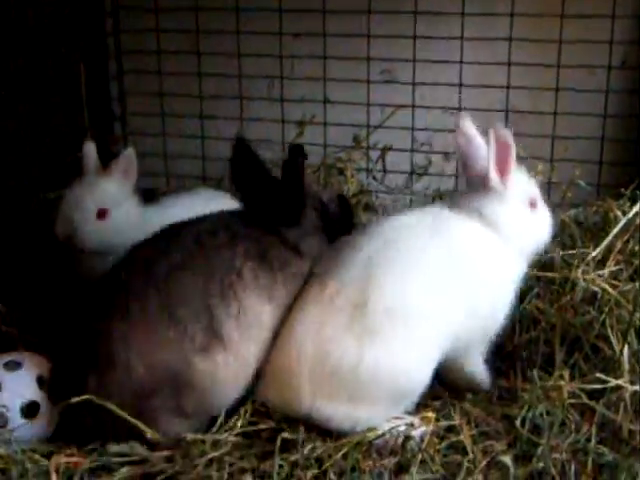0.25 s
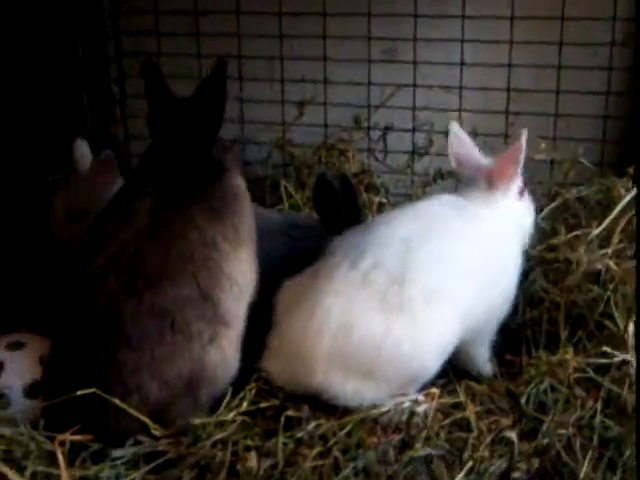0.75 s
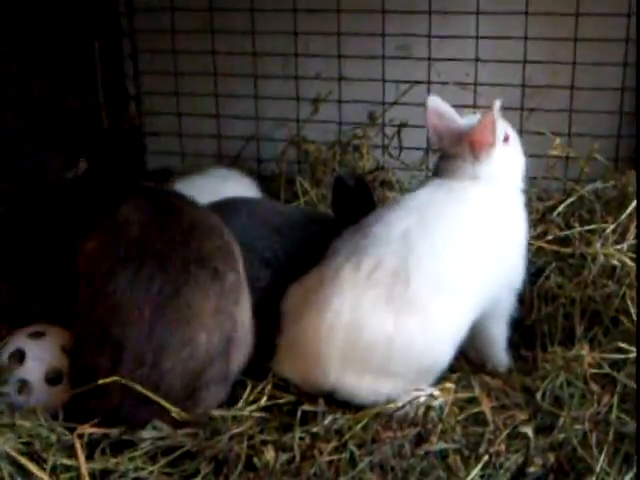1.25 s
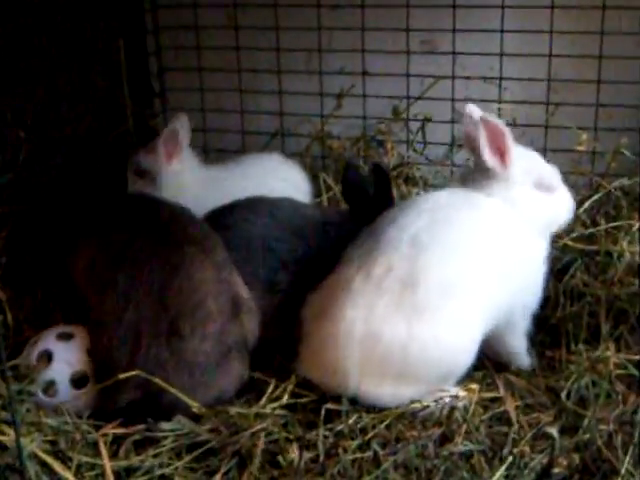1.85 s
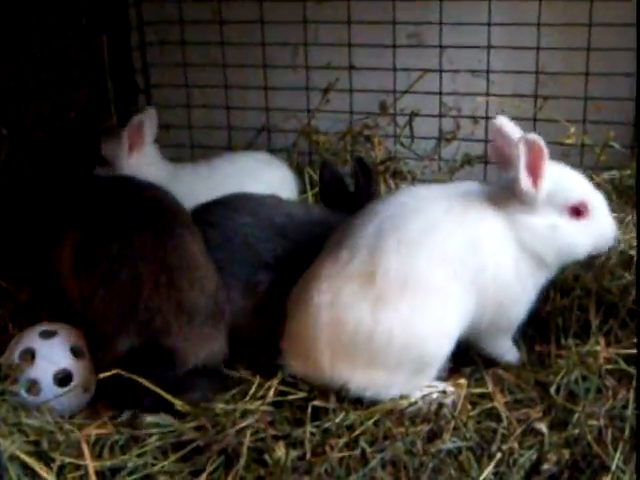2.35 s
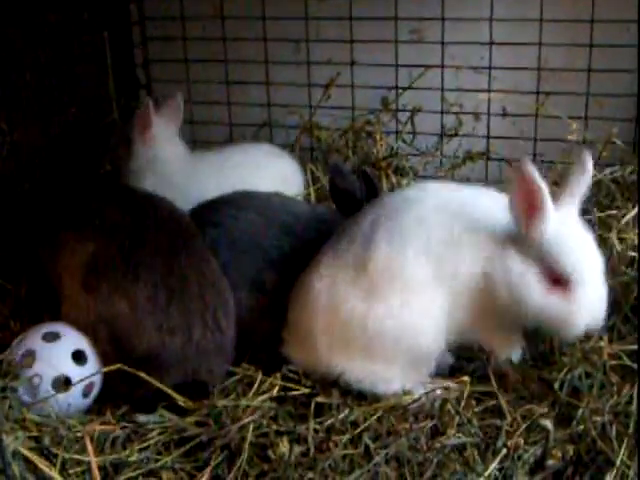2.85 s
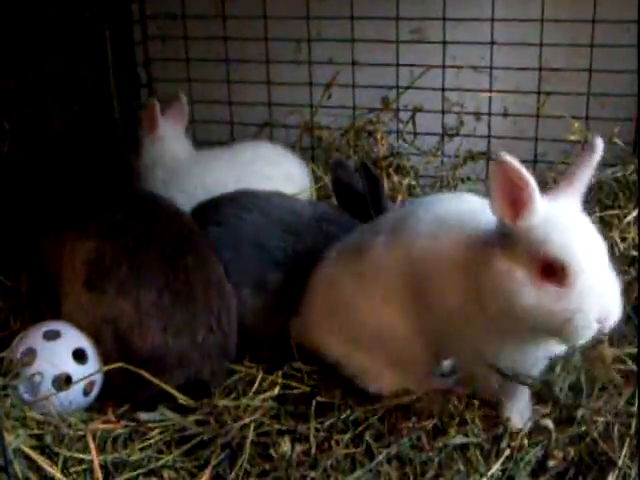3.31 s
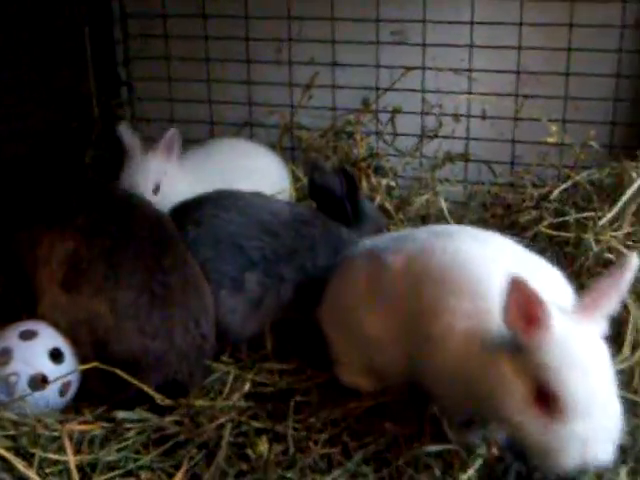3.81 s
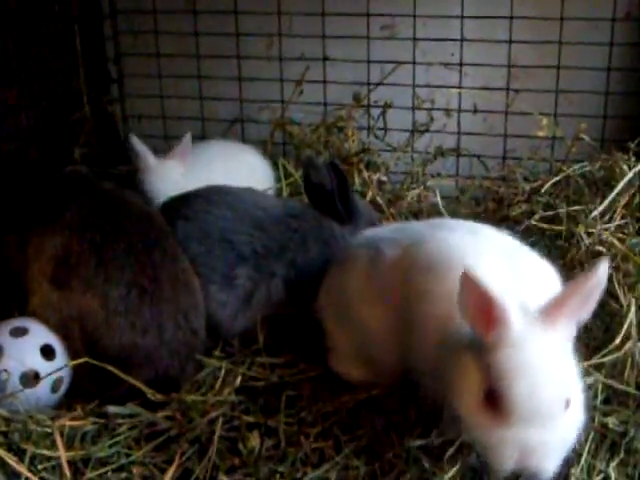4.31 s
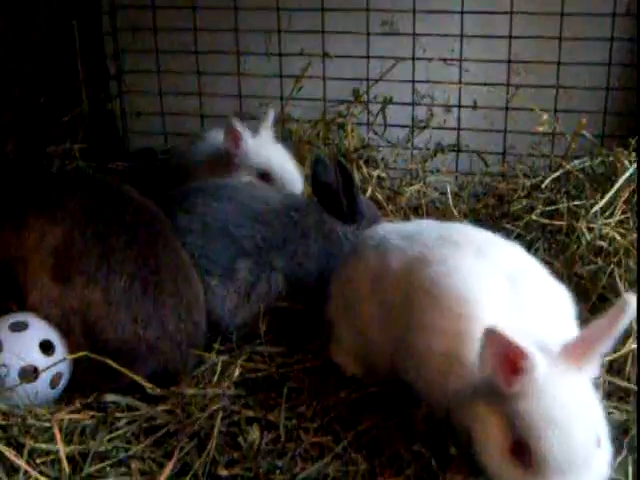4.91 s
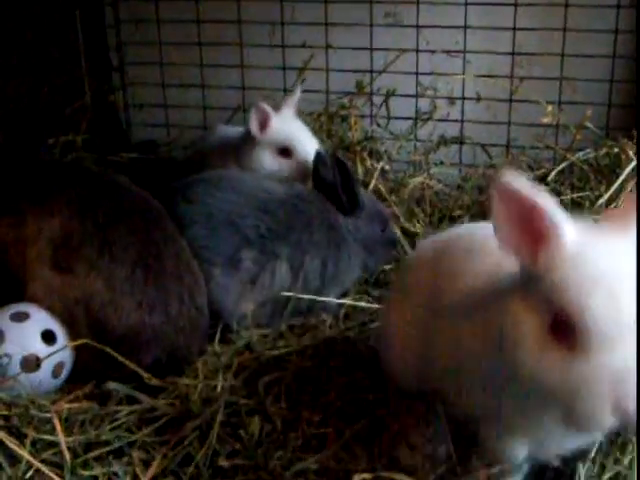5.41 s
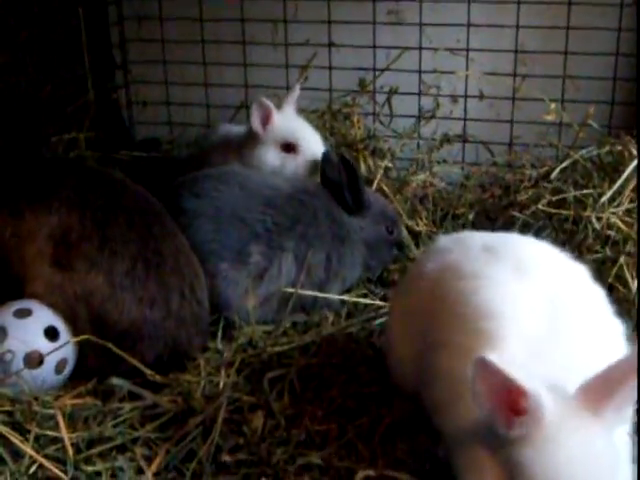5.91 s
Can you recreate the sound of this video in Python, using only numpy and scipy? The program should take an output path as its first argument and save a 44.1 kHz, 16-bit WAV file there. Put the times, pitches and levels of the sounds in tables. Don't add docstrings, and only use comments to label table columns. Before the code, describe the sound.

Rabbits nibble and shift in a hay-lined pen, very quietly. Steady hiss from a small camera nearly covers them. Its lens motor clicks in tiny four-step bursts several times a second, and low dull thuds pulse irregularly beneath. Crisp hay snaps and soft paw bumps cluster at the start, around the middle and before the five-second mark. The microphone is close and cheap, the sound dry, with no echo.

```python
import sys
import numpy as np
from scipy import signal
from scipy.fft import rfft, irfft
from scipy.io import wavfile
from scipy.ndimage import uniform_filter1d

SR = 44100
rng = np.random.default_rng(int(sys.argv[2]) if len(sys.argv) > 2 else 0)


def voltage_ratio(decibels):
    exponent = np.asarray(decibels, float) / 20
    return 10 ** exponent


def to_wav(sig):
    pcm = np.clip(np.atleast_2d(sig), -1, 1) * 32767
    pcm = np.round(pcm).astype(np.int16)
    wavfile.write(sys.argv[1], SR, pcm.T)


N = 271636


def evened(x):
    return x / np.sqrt(np.mean(x ** 2) + 1e-20)


def body_ring(resonances):
    t = np.arange(900) / SR
    answer = np.zeros(900)
    for k, (hz, width_hz, db) in enumerate(resonances):
        fade = np.exp(-np.pi * width_hz * t)
        answer += (-1) ** k * voltage_ratio(db) * fade * np.sin(2 * np.pi * hz * t)
    return answer / np.linalg.norm(answer)


def add(mix, start_s, sound):
    part = mix[round(start_s * SR):][:len(sound)]
    part += sound[:len(part)]


# frequency in Hz, level in dB per Hz.
HISS_COLOUR = [(12, -28.5), (20, 4), (49, -5.5), (395, -15.5), (473, -18.5), (626, -18), (808, -21),
               (2300, -27), (4200, -29.5), (4690, -31.5), (5470, -30.5), (7060, -29), (7700, -29.5),
               (8000, -32.5)]
HISS_DB = -52


def hiss():
    frames, hz = N // 256 + 5, np.fft.rfftfreq(1024, 1 / SR)
    real, imaginary, patches = rng.standard_normal((frames, 513, 3)).T
    patches = uniform_filter1d(patches, size=12, axis=0)
    patches = evened(uniform_filter1d(patches, size=8, axis=1))
    colour_hz, colour_db = np.transpose(HISS_COLOUR)
    level_db = np.interp(np.log(hz + 1), np.log(colour_hz + 1), colour_db)
    spectrum = (real + 1j * imaginary) * voltage_ratio(level_db[:, None] + 1.02 * patches)
    noise = signal.istft(spectrum, nperseg=1024, noverlap=768)[1][:N]
    return voltage_ratio(HISS_DB) * evened(noise)


# frequency in Hz, level in dB.
WHINE_TONES = [(4290, -75.5)]


def whine():
    t = np.arange(N) / SR
    return sum(np.sqrt(2) * voltage_ratio(db) * np.sin(2 * np.pi * hz * t) for hz, db in WHINE_TONES)


# start in seconds, depth of the sag in dB, length in ms.
PLAIN_WRITES = [(0.28, -35.6, 8.6), (0.7194, -36.6, 11.0), (0.8724, -35.4, 9.3), (1.0066, -35.0, 9.0),
                (1.112, -36.6, 13.6), (1.3026, -38.5, 9.4), (1.4033, -36.8, 11.9), (1.6739, -36.2, 10.8),
                (1.775, -34.5, 9.8), (2.0816, -35.2, 11.5), (2.2818, -35.9, 9.2), (2.4179, -37.1, 10.2),
                (2.6667, -35.1, 9.4), (2.7713, -37.2, 11.1), (2.9428, -35.6, 10.6), (3.0869, -37.4, 13.2),
                (3.239, -36.2, 9.4), (3.4155, -36.7, 11.6), (3.6731, -34.6, 8.3), (3.8301, -36.2, 8.9),
                (4.0788, -34.3, 9.0), (4.3345, -36.2, 8.5), (4.4664, -36.7, 12.3), (4.6183, -34.0, 8.6),
                (4.7491, -35.1, 12.9), (4.918, -34.7, 8.5), (5.537, -35.4, 9.2), (5.7054, -35.2, 11.5),
                (5.9801, -35.1, 12.1), (6.0822, -34.6, 9.1)]
EASE_AT_MS, EASE_SHARE = 4.8, .2
# start in seconds, depth of the sag in dB, length in ms,
# time of the pause in ms, share of the sag recovered in the pause.
BROKEN_WRITES = [
    (0.0945, -29.3, 20.0, 5.1, 0.06),
    (0.4179, -35.4, 12.3, 11.6, 0.67),
    (0.5865, -36.1, 15.3, 6.3, 1.06),
    (1.5475, -35.4, 11.2, 3.0, 0.9),
    (1.9456, -35.0, 13.2, 10.1, 1.12),
    (2.5347, -35.5, 11.0, 5.6, 0.85),
    (5.0673, -36.4, 13.8, 16.0, 0.0),
    (5.245, -38.5, 10.7, 12.1, 1.2),
    (5.4129, -37.3, 18.2, 3.6, 0.89),
    (5.8169, -35.3, 13.2, 5.0, 0.88),
]
# multiple of the page rate, level in dB against the sag.
PAGE_RIPPLE = [(1, -16.5), (1.5, -26.5), (2, -20.5), (3, -21.5), (6, -27.5)]
PAGE_HZ = 206.1
SAG_TRIM_DB, COUPLING_HZ = 0.3, 7.0


def sags():
    out = np.zeros(N)
    multiple, ripple_db = np.transpose(PAGE_RIPPLE)[:, :, None]
    plain = [(*row, EASE_AT_MS, EASE_SHARE) for row in PLAIN_WRITES]
    writes = sorted(plain + BROKEN_WRITES)
    chances = rng.random((len(writes), 3, len(PAGE_RIPPLE), 1))
    ms = np.arange(1600) / SR * 1000 - 4
    for (s, db, length, pause, share), (phase, detune, size) in zip(writes, chances):
        onset = .5 + .5 * np.tanh(ms / 0.9)
        release = .5 + .5 * np.tanh((length - ms) / 0.92)
        load = onset * release * (1 - share * np.exp(-((ms - pause) / 1.21) ** 2))
        turns = multiple * PAGE_HZ * (1 + 0.067 * (detune - .5)) * ms / 1000 + phase
        ripple = voltage_ratio(ripple_db + 6.0 * (size - .5)) * np.cos(2 * np.pi * turns)
        load = load * (1 + np.sum(ripple, axis=0))
        add(out, s - .004, -voltage_ratio(db + SAG_TRIM_DB) * load)
    return signal.lfilter(*signal.butter(1, COUPLING_HZ, "high", fs=SR), out)


def rattles(resonances, fade_s, swell=0):
    t = np.arange(600) / SR
    blows = rng.standard_normal((len(TICKS), 4, 600)) * t ** swell * np.exp(-t / fade_s)
    rung = signal.fftconvolve(blows, body_ring(resonances)[None, None], axes=-1)
    return rung / abs(rung).max(-1, keepdims=True)


# start in seconds, peak in dB, step (0-3) at which the push peaks.
TICKS = [(0.1239, -34, 1.4), (0.2569, -44, .9), (0.364, -38, 1.8), (0.5581, -42.5, 1.7), (0.7897, -37, .6),
         (0.9279, -43.5, 1.2), (1.1249, -40.5, 1.4), (1.2941, -45.5, 1.9), (1.4957, -40, 1.6),
         (1.6947, -46.5, 1.8), (1.823, -41.5, 1.7), (2.0286, -47.5, 1.9), (2.1937, -43, 0.98),
         (2.3884, -46, 3.3), (2.5896, -42.5, 1.5), (2.6911, -46.5, 2.3), (2.8948, -43, 1.7),
         (3.031, -46, 1.1), (3.2309, -39.5, 1.5), (3.3686, -46.5, 1.3), (3.556, -40.5, 1.7),
         (3.6922, -44, 1.3), (3.8942, -39.5, 0.69), (4.0922, -42.5, 1.3), (4.2234, -38.5, 2),
         (4.4569, -43.5, 0.87), (4.6967, -38, 2.1), (4.827, -43, 1.8), (4.9684, -52, .6)]
# frequency in Hz, width in Hz, level in dB.
SHELL = [(3115, 214, -12.5), (4170, 720, -8.5), (5586, 540, -0.5), (6414, 330, -2.5), (6590, 420, -4.5),
         (7660, 780, -1.5)]
# frequency in Hz, width in Hz, level in dB.
KNOCK = [(645, 186, 0), (986, 275, -4), (1355, 220, -5.5), (1950, 420, -3.5)]
# frequency in Hz, width in Hz, level in dB.
BARREL = [(2430, 1000, 0.5), (3120, 480, 3.5), (3820, 660, -1.5)]
STEP_S = .002
DROOP_DB = 1.5
KNOCK_DB, KNOCK_GROWTH, USUAL_PEAK_DB = -48, 0.3, -42.5


def motor():
    out = np.zeros(N)
    rings, knocks = rattles(SHELL, 0.00014), rattles(KNOCK, 0.0019)
    barrels, whirrs = rattles(BARREL, 0.0024), rattles(SHELL, .002, swell=0.72)
    bursts = zip(TICKS, rings, knocks, barrels, whirrs)
    for (s, peak_db, peak_step), ring, knock, barrel, whirr in bursts:
        steps_db = peak_db - DROOP_DB * (np.arange(4) - peak_step) ** 2
        knock_db = KNOCK_DB + KNOCK_GROWTH * (peak_db - USUAL_PEAK_DB)
        barrel_db = np.mean(steps_db) - 12.5
        for k, db in enumerate(steps_db):
            step_s = s + k * STEP_S
            body = voltage_ratio(knock_db) * knock[k] + voltage_ratio(barrel_db) * barrel[k]
            add(out, step_s, voltage_ratio(db + 2.0) * ring[k] + body)
            add(out, step_s - .0025, voltage_ratio(db - 12.5) * whirr[k])
    return out


# start in seconds, peak in dB, pitch in Hz,
# time to fade by 60 dB in seconds.
BUMPS = [
    (.515, -41, 930, 0.046),
    (2.19, -42, 294, 0.1),
    (3.078, -42.5, 231, 0.064),
    (4.795, -54, 404, 0.024),
    (4.952, -49, 380, 0.045),
    (5.409, -49, 414, 0.076),
    (0.1, -49, 277, .06),
    (.125, -38.5, 1017, 0.033),
    (4.086, -44, 1030, 0.041),
    (4.698, -33.5, 1470, 0.022),
]


def paws():
    out, t = np.zeros(N), np.arange(4000) / SR
    for s, db, hz, t60 in BUMPS:
        push = 1 - np.exp(-t / 0.0041)
        add(out, s, voltage_ratio(db - 60 * t / t60) * push * np.sin(2 * np.pi * hz * t))
    return out


# time of the climax in seconds, level in dB, spread in seconds.
STIRS = [(0, -57.5, 0.11), (.16, -56.5, 0.081), (.29, -55.5, 0.028), (.45, -61.5, .15),
         (1.68, -56.5, 0.046), (1.83, -61, .03), (2.609, -50, .02), (3.25, -67, 0.057), (3.66, -55, 0.087),
         (4.69, -53.5, 0.017), (4.8, -54.5, 0.035), (4.96, -59, .08), (5.3, -62, 0.092), (5.42, -52.5, 0.1),
         (5.53, -60, 0.074), (5.69, -58, 0.037), (5.821, -53, .04), (6.16, -59, 0.22)]
CHEWING_DB = -66.5


def stirring():
    t = np.arange(N) / SR
    return voltage_ratio(CHEWING_DB) + sum(voltage_ratio(db) * np.exp(-abs(t - s) / spread) for s, db, spread in STIRS)


# start in seconds, peak in dB, low knock in dB against the snap,
# time to fade by 60 dB in seconds.
SNAPS = [(0.115, -32.5, -14.5, 0.017), (0.1804, -56, -10, 0.025), (0.282, -44, -9, 0.032),
         (0.4997, -44.5, -1, 0.033), (0.5381, -39, -2, 0.025), (0.7991, -42, -3, 0.015),
         (1.66, -45, 3, 0.025), (2.6844, -36.5, -18, 0.011), (3.252, -61, -6, 0.022),
         (3.884, -44.5, -13, 0.035), (3.9408, -49, -14, 0.017), (4.2128, -40, -14, 0.044),
         (4.6707, -35, -28, 0.036), (4.6846, -37.5, -10, 0.045), (4.7945, -45.5, -9, 0.031),
         (5.7946, -53, -9, 0.014), (5.8206, -40, -16, 0.028), (5.9388, -45.5, 3, 0.031)]
# frequency in Hz, width in Hz, level in dB.
STALKS = [(1130, 690, -2), (3100, 940, -1), (4020, 870, -1.5), (5560, 960, -3.5), (7270, 1100, -1)]
GRAINS_PER_S = 5400


def hay():
    snaps, knocks = np.zeros(N), np.zeros(N)
    t = np.arange(900) / SR
    splinters = rng.standard_normal((len(SNAPS), 2, 900))
    for (s, db, knock_db, t60), (bright, low) in zip(SNAPS, splinters):
        fade = voltage_ratio(db - 9.5 - 60 * t / t60)
        add(snaps, s, fade * bright)
        add(knocks, s, voltage_ratio(knock_db) * fade * low)
    clumps = evened(uniform_filter1d(rng.standard_normal(N), size=200))
    grains = rng.standard_normal(N) * (rng.random(N) < GRAINS_PER_S / SR) * voltage_ratio(1.7 * clumps)
    grains = evened(grains) * stirring() * voltage_ratio(-8.0)
    stalks = signal.oaconvolve(snaps + grains, body_ring(STALKS))[:N]
    bedding = signal.oaconvolve(knocks, body_ring(KNOCK))[:N]
    return stalks + bedding


PORT_NOTCH_HZ, PORT_NOTCH_WIDTH_HZ = 4680, 170


def port(x):
    notch = signal.iirnotch(PORT_NOTCH_HZ, PORT_NOTCH_HZ / PORT_NOTCH_WIDTH_HZ, fs=SR)
    return 0.72 * signal.lfilter(*notch, x) + 0.36 * x


SETTLE_S, SETTLE_DB, OFFSET_DB = .157, 4.5, -48.5


def scene():
    early = np.arange(N) < SETTLE_S * SR
    floor = voltage_ratio(SETTLE_DB * early) * (0.88 * port(hiss()) + whine())
    floor = floor + voltage_ratio(OFFSET_DB) * early
    return (floor + sags() + port(motor() + paws() + hay()))[None]


def band_limit(x):
    return signal.sosfilt(signal.butter(12, 9030, fs=SR, output="sos"), x)


CONVERTER_HZ = 16000


def record(dry):
    spectrum = rfft(dry)
    spectrum[:, np.fft.rfftfreq(N, 1 / SR) > CONVERTER_HZ / 2] = 0
    mirror = 2 * np.cos(2 * np.pi * CONVERTER_HZ * np.arange(N) / SR)
    sampled = irfft(spectrum, N) * (1 + mirror)
    edge = signal.firwin(91, 8000, window=("kaiser", 8.5), fs=SR)
    return band_limit(signal.oaconvolve(sampled, edge[None], "same"))


dry = scene()
out = record(dry)
to_wav(out)
```